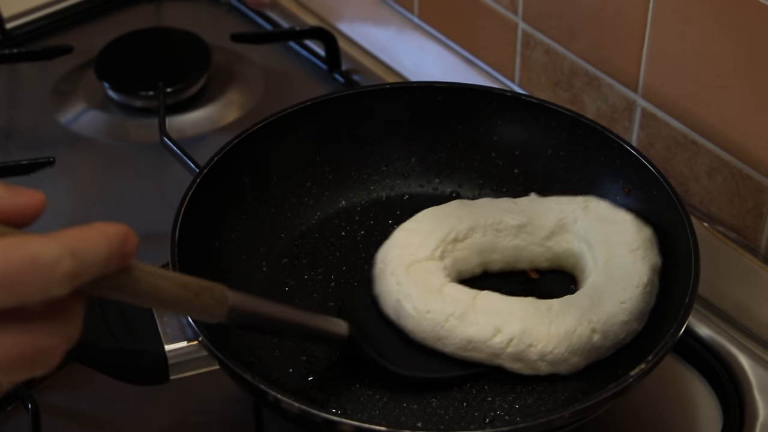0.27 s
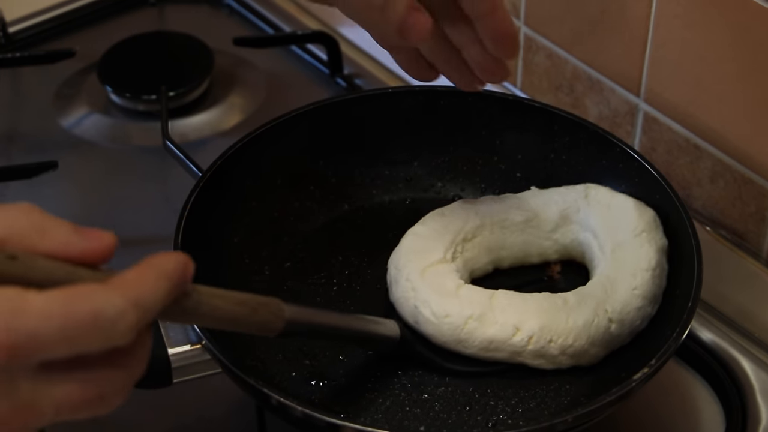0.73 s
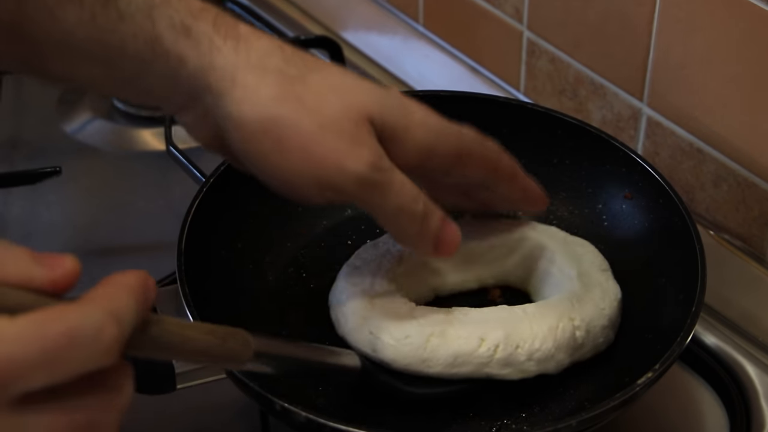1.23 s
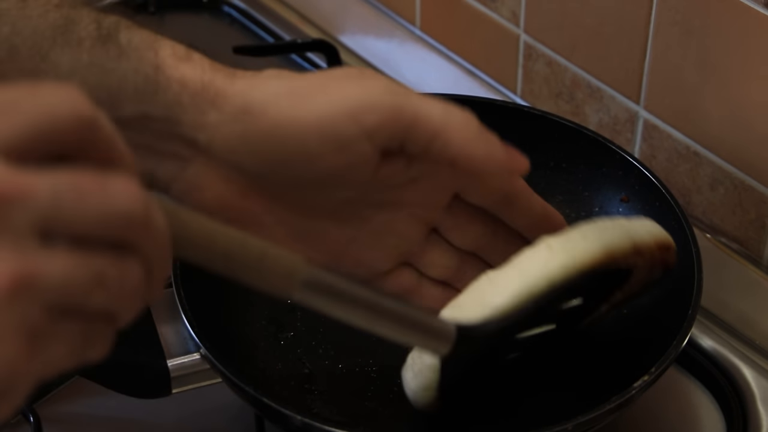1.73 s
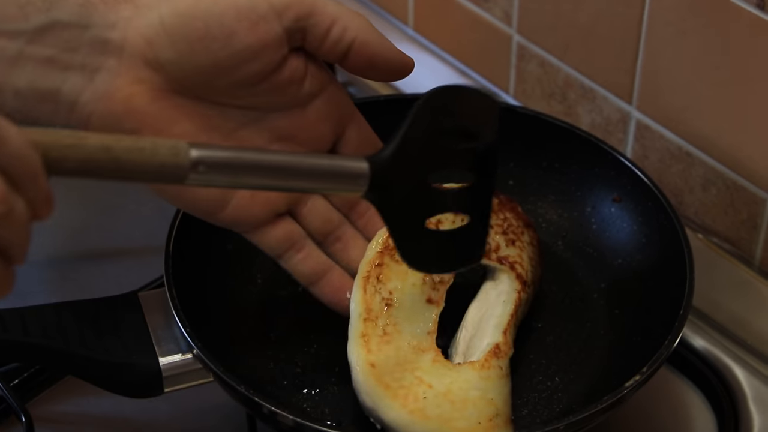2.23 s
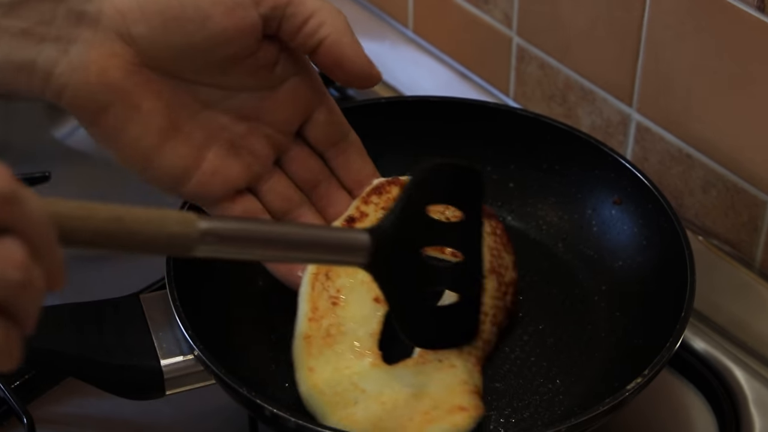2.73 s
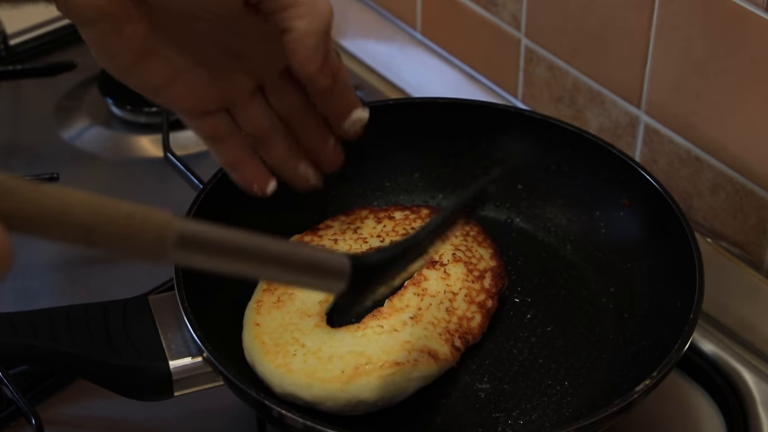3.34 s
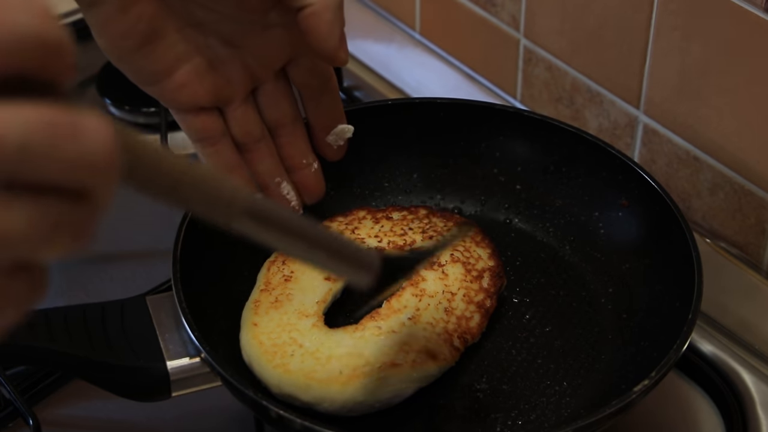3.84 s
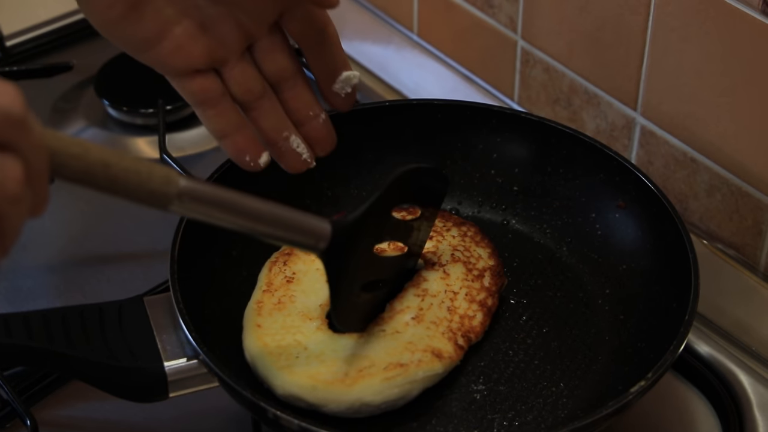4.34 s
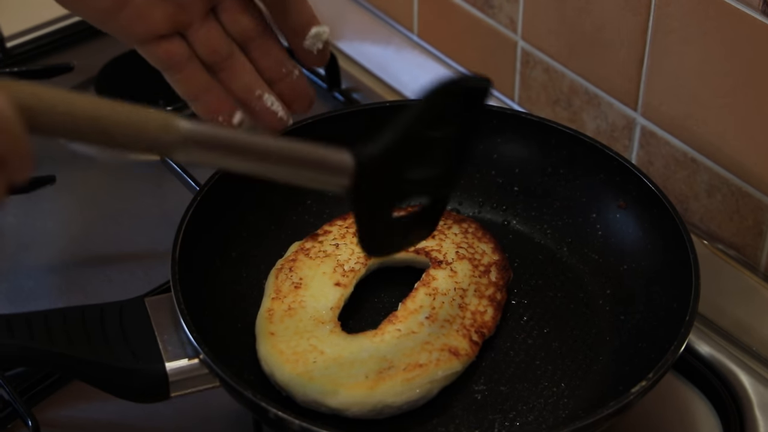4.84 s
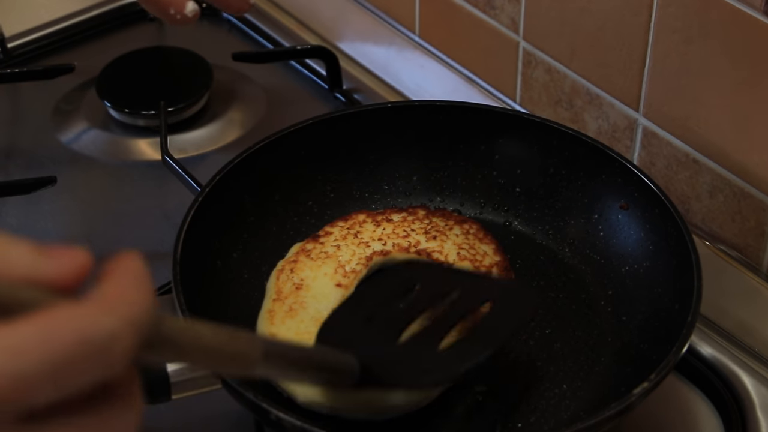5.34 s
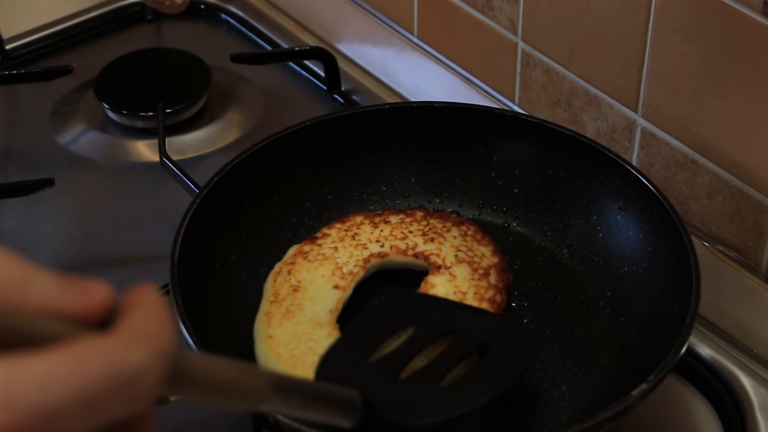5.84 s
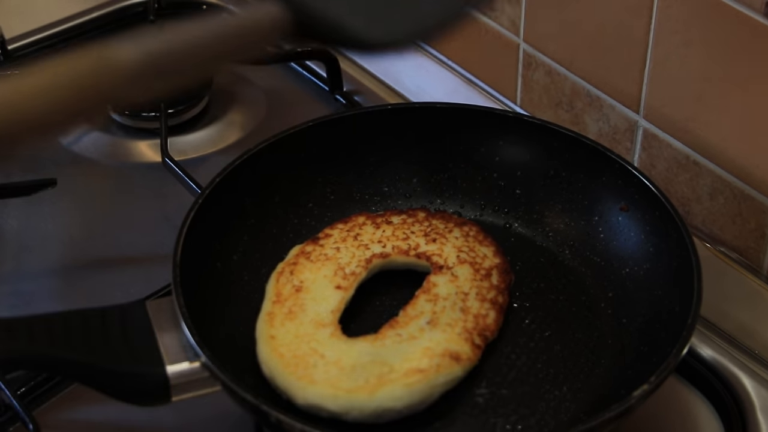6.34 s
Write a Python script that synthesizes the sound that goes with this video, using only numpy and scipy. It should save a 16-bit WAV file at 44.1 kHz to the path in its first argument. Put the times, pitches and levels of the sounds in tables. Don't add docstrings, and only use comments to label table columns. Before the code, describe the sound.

Close, near-mono sound of a pan on a kitchen stove, with very short reflections from tiles. From 0 to 2 seconds the oil sizzles thinly, broken by many crisp, irregular snaps of bursting drops. A spatula scrapes the pan in brief, ringing metallic strokes around 0.3 to 0.7 seconds, with a firm tap at 0.42 and soft steam puffs between 0.35 and 0.9. Drops pop loudly near 0.75 and 1.05; a hard click comes at 1.49, then lighter scraping from 1.6 to 1.9. Around 2.13 a sharp pop and light taps mark the flip, the pan ringing more freely. From 2.2 the raw side fries in a dense, bright sizzle, fullest from about 3 to 5 seconds, with tiny spits and thin, wavering high whistles, easing slightly by 6.6. A low air flutter passes near 3.4; faint burner rumble and hum lie underneath.

```python
import sys
import numpy as np
from scipy import signal
from scipy.fft import rfft, irfft, next_fast_len
from scipy.io import wavfile
from scipy.ndimage import map_coordinates

SR = 44100
rng = np.random.default_rng(int(sys.argv[2]) if len(sys.argv) > 2 else 0)


def gain_from_decibels(decibels):
    exponent = np.asarray(decibels, float) / 20
    return 10 ** exponent


def pcm_store(signal):
    levels = np.round(np.clip(np.atleast_2d(signal), -1, 1) * 32767)
    wavfile.write(sys.argv[1], SR, levels.astype(np.int16).T)


N = 290619

# (time [s], sizzle level [dB], finest spray level [dB])
OIL_LEVELS = [
    [(0.0, -40, -41), (0.188, -43.5, -44), (0.432, -39, -40), (0.582, -39, -42), (0.772, -36.5, -43),
     (0.884, -40.5, -47), (1.1, -44, -45)],
    [(1.1, -38.5, -40), (1.43, -44, -45), (1.688, -45.5, -44), (1.914, -48, -46), (2.034, -39, -37),
     (2.146, -34.5, -38), (2.2, -32, -30)],
    [(2.2, -33.5, -30), (2.31, -33.5, -32.5), (2.59, -29.5, -30.5), (2.99, -29.5, -30), (3.14, -26.5, -25),
     (3.48, -29.5, -28), (3.68, -27, -25), (4.07, -28, -26.5), (4.51, -26.5, -26), (4.82, -31, -24.5),
     (5.13, -29, -27), (5.43, -28.5, -26), (5.88, -29.5, -27.5), (6.33, -31, -30), (6.59, -31.5, -35)],
]
# (time [s], length [s], level [dB], spray over that [dB])
STEAM_PUFFS = [
    (0.348, 0.036, -33, -18),
    (.43, 0.093, -30, -12),
    (0.607, 0.067, -28, -13),
    (0.712, 0.053, -34, 0),
    (0.871, 0.066, -29.5, -8),
    (1.489, .025, -36, 3),
    (1.846, .12, -42, -18),
]
# (time [s], length [s], pitch [Hz], width [Hz], level [dB])
AIR_POCKETS = [
    (2.9, 1.04, 6200, 450, -5.5),
    (2.9, 1.04, 4950, 150, -9),
    (3.3, 1.9, 3460, 150, -11),
    (3.9, 1.37, 5250, 400, -5.5),
    (4., 1.3, 6670, 250, -10),
    (4.3, 2.3, 5540, 170, -8.5),
    (4.5, 1.8, 7170, 200, -10.5),
    (4.6, 1.2, 3230, 130, -14),
    (5.4, 1.35, 3530, 100, -5),
    (3.6, 2, 11230, 300, -12),
]
# (frequency [Hz], level [dB per Hz])
FIZZ_SPECTRUM = [(1470, -16), (2500, -2), (2840, -9.5), (3470, -2.5), (4250, -3), (5500, 1), (5990, 0.5),
                 (7070, 0), (9000, -8.5), (11700, -3), (19800, -120)]
SPRAY_SPECTRUM = [(5000, -27), (8500, -1.5), (12300, 4), (15100, 5), (15700, 3)]
# (time [s], ring [dB], second ring [dB], third ring [dB], rasp [dB])
PAN_LEVELS = [
    [(0.0, -43, -43.5, -44, -41.5), (0.37, -50.5, -51, -50, -43.5), (0.56, -40.5, -40, -45, -43),
     (0.72, -43, -46, -50, -46), (0.88, -36, -35, -46, -46), (1.33, -39, -41, -48, -47),
     (1.48, -38.5, -35.5, -51, -48), (1.67, -35, -36, -45, -43), (1.8, -35, -34, -37, -42),
     (1.95, -40, -42.5, -42.5, -46), (2.2, -39, -36, -38.5, -37)],
    [(2.2, -42, -40, -37, -40), (2.33, -36.5, -34.5, -36, -34), (2.54, -31.5, -32, -32, -33),
     (2.7, -32, -34, -37, -33.5), (2.87, -31, -36.5, -38, -36.5), (3.09, -32, -34, -38.5, -36.5),
     (3.28, -32.5, -33, -35.5, -37), (3.48, -34, -33.5, -33.5, -36), (3.63, -33, -29, -32.5, -34),
     (3.79, -34, -29, -32, -31), (4.2, -32, -33.5, -34.5, -40), (4.5, -33.5, -33.5, -34, -32.5),
     (4.73, -33, -32.5, -33, -30.5), (5.02, -36.5, -35.5, -37.5, -31), (5.23, -35.5, -37.5, -35.5, -34),
     (5.45, -35, -35.5, -34.5, -30.5), (5.75, -35, -36.5, -33.5, -41), (6.04, -34, -38, -35, -37),
     (6.41, -38, -39, -36, -41), (6.59, -38, -38.5, -37, -36)],
]
# (time [s], length [s], ring [dB], second ring [dB], third ring [dB], rasp [dB])
BLADE_STROKES = [(0.326, 0.079, -32, -35.5, -39, -37.5), (0.412, .018, -22, -36, -32, -24),
                 (0.435, 0.072, -23.5, -24.5, -28.5, -24), (0.611, 0.062, -23, -25.5, -29, -28.5),
                 (.69, 0.074, -33.5, -37, -45, -42), (0.89, 0.067, -47, -42.5, -44.5, -42),
                 (1.04, 0.069, -40, -40, -45.5, -53.5), (1.336, 0.053, -45.5, -42.5, -51, -50),
                 (1.597, 0.098, -29.5, -30.5, -41, -42), (1.697, 0.071, -29.5, -27, -33.5, -38),
                 (1.842, 0.069, -30, -27.5, -30, -32.5), (1.913, 0.044, -30, -32, -39, -38)]
# (pitch [Hz], width [Hz], level [dB])
LOW_MODES = [(746, 16, -7), (828.7, 37.8, 1), (912, 53, -4), (989, 118, -7.5), (537, 91, -16.5)]
SECOND_MODES = [(1194, 66, -9.5), (1265, 53, -6.5), (1383, 40, -0.5), (1442, 42, -3.5), (1530, 78, -7.5),
                (1691, 100, -8)]
THIRD_MODES = [(1890, 130, -4.5), (2093, 70, -1), (2229, 55, -1), (2414, 71, -4.5)]
RASP_MODES = [(2878, 370, 0), (3335, 270, -0.5), (3810, 170, -1.5), (4440, 420, -4.5), (5230, 430, -4),
              (6480, 230, -9)]
# (pitch [Hz], width [Hz], level [dB])
FREE_MODES = [(1386, 24, 1), (2063, 28, -5), (2225, 15, -2), (2860, 16, -1), (4560, 64, -1),
              (5100, 60, -10)]
# (time [s], length [s], level [dB])
CLEAR_RING = (1.96, 1.27, -33)
# (time [s], draught level [dB], burner level [dB], room level [dB])
KITCHEN_LEVELS = [(0.0, -51, -40, -43.5), (0.22, -51, -52, -47.5), (0.35, -60, -41, -39),
                  (0.86, -46, -46.5, -45), (1.54, -56, -43.5, -44.5), (1.91, -47, -42, -40),
                  (2.11, -54, -48.5, -46), (2.83, -51, -51.5, -44), (3.17, -51, -55, -41),
                  (3.32, -56, -44, -47.5), (3.47, -44, -52, -45), (3.72, -54, -53, -46),
                  (5.47, -54, -48.5, -45), (5.95, -49, -51.5, -46.5), (6.48, -58, -49, -45),
                  (6.59, -49, -55, -47)]
# (frequency [Hz], level [dB per Hz])
DRAUGHT_SPECTRUM = [(12, -39), (20, -10), (34, -9.5), (48, 7.5), (85, -2), (110, -37), (190, -120)]
BURNER_SPECTRUM = [(50, -25), (85, 0.5), (102, -0.5), (156, -7.5), (199, -0.5), (250, -9.5), (320, -31),
                   (550, -120)]
ROOM_SPECTRUM = [(150, -51), (250, -10), (344, 2), (461, -9.5), (483, -6), (516, 1.5), (599, -4.5),
                 (700, -4), (910, -42), (1540, -120)]
# (frequency [Hz], level [dB])
MAINS_HUM = [(100, -56)]
# (time [s], length [s], negative runs back from the time, pitch [Hz], level [dB])
HAND_GUST = (3.5, -0.2, 47, -26)
# (time [s], peak level [dB], pitch [Hz], spray [dB], spray t60 [s], pan knock [dB])
DROP_POPS = [(0.0044, -15.5, 10500, -16, 0.035, -16), (0.0777, -21, 6800, -9, 0.035, -16),
             (0.1327, -10.5, 11500, -10, 0.035, -13), (0.164, -14.5, 6900, -13, 0.035, -16),
             (0.2462, -6, 10600, -12, 0.045, -19), (0.4195, -11, 4200, -14, 0.035, -12),
             (0.4273, -14, 5600, -9, 0.035, -16), (0.5544, -17, 11500, -14, 0.035, -16),
             (0.5935, -26, 6480, -14, 0.035, -16), (0.7497, -5, 5830, -16, 0.029, -16),
             (0.839, -14, 6110, -19, 0.035, -14), (0.9355, -8.5, 6000, -19, 0.035, -16),
             (1.052, -2, 6500, -15, 0.033, -29), (1.1059, -21, 8070, -14, 0.035, -16),
             (1.1238, -16, 6540, -14, 0.035, -19), (1.1498, -12, 11600, -12, 0.035, -21),
             (1.1907, -13, 6700, -9.5, 0.046, -20), (1.2436, -11, 6600, -11.5, 0.055, -8),
             (1.3744, -23, 6010, -14, 0.035, -16), (1.4062, -24, 10300, -14, 0.035, -16),
             (1.4844, -7, 4770, -12.5, 0.032, -23), (1.4934, -6, 11400, -14, 0.035, -16),
             (1.5319, -12.5, 7970, -10, 0.035, -14), (1.5594, -17, 12400, -14, 0.035, -16),
             (1.5803, -18.5, 8600, -7, 0.035, -16), (1.6734, -14.5, 9900, -10, 0.035, -16),
             (1.7169, -26, 5040, -17, 0.035, -16), (1.7838, -26, 5050, -14, 0.035, -16),
             (1.9454, -14.5, 4300, -11, 0.039, -16), (1.9834, -15, 12800, -14, 0.035, -16),
             (2.0004, -16, 12000, -12, 0.035, -16), (2.0168, -12.5, 12800, -17, 0.035, -16),
             (2.0288, -18, 4300, -14, 0.035, -16), (2.0804, -12, 8300, -13, 0.035, -13),
             (2.134, -1.5, 12000, -16, 0.048, -19), (2.1944, -13, 11100, -11, 0.035, -14),
             (2.2577, -17, 4520, -9, 0.038, -16)]
# (pitch [Hz], width [Hz], level [dB])
BOWL_MODES = [(5830, 1600, 3.5), (11500, 4000, 1.5)]
# (time [s], click level [dB], click width [s], pan blow [dB])
EDGE_TAPS = [
    (.42, -10, 0.00012, 7),
    (1.4858, -4, 0.000087, 2.5),
    (1.7178, -24, .0001, 10),
    (2.132, -23, .0002, 8),
    (2.175, -24, .0002, 4),
]
# (time [s], peak level [dB], pitch [Hz])
SIZZLE_SPITS = [(2.401, 0, 9730), (3.0446, 0, 6830), (3.092, -14, 6270), (3.1319, -1, 6200),
                (3.3285, -8, 6840), (3.4467, -8, 5100), (3.4915, -1, 6210), (3.532, -2, 11100),
                (3.6637, -3, 11200), (3.7865, -12, 6160), (3.8229, -5, 4950), (4.12, 4, 6500),
                (4.1581, -1, 8260), (4.2808, -3, 5470), (4.3555, 1, 5590), (4.7303, 0, 7110),
                (4.7822, -9, 11900), (5.2062, 0, 9740), (5.2596, -14, 5610), (5.2925, -10, 12100),
                (5.4466, 3, 12700), (5.521, -1, 10700), (5.5479, -10, 5500), (5.7151, -10, 5360),
                (5.7769, -2, 12000), (5.8807, 3, 12100), (6.0907, -18, 5680), (6.194, -4, 5380),
                (6.229, -7, 5240), (6.4833, -8, 5850)]


def unit(x):
    return x / np.sqrt(np.mean(x ** 2) + 1e-20)


def along(points, hz):
    f, v = np.transpose(points)
    return np.interp(np.log(hz + 1), np.log(f + 1), v)


def curves(rows):
    s, *cols = np.transpose(rows)
    return [np.interp(np.arange(N) / SR, s, c) for c in cols]


def wobble(rate):
    knots = rng.standard_normal(int(N * rate / SR) + 4)
    return map_coordinates(knots, [np.arange(N) * rate / SR])


def swell(s, length):
    return np.sin(np.pi * np.clip((np.arange(N) / SR - s) / length, 0, 1)) ** 2


def filtered(x, response):
    m = next_fast_len(N + SR // 2)
    return irfft(rfft(x, m) * response(np.fft.rfftfreq(m, 1 / SR)), m)[..., :N]


def coloured(x, spectrum):
    return unit(filtered(x, lambda hz: gain_from_decibels(along(spectrum, hz))))


def ringing(x, modes):
    def response(f):
        total = 0
        for k, (centre, width, db) in enumerate(modes):
            damping = 1j * f * width
            total = total + (-1) ** k * gain_from_decibels(db) * damping / (centre * centre - f * f + damping)
        return total
    return filtered(x, response)


def bubbles(rate, spread_db, t60, bed_db):
    chance, size = rng.random(N), rng.exponential(1, N)
    starts = (chance < rate / SR) * gain_from_decibels(spread_db * np.minimum(size, 4)) ** 2
    power = signal.lfilter([1], [1, -gain_from_decibels(-120 / (t60 * SR))], starts)
    return unit(np.sqrt(power / power.mean() + gain_from_decibels(2 * bed_db)) * rng.standard_normal(N))


def chirps(count, hz, cycles, spread_db):
    draw, k = rng.random((count, 2)), np.arange(96)
    pitch = hz * np.exp(0.18 * rng.standard_normal((count, 1))) / SR
    size = gain_from_decibels(-spread_db * np.log(1 - 0.98 * draw[:, 1:]))
    wave = size * np.sin(2 * np.pi * pitch * k) * np.exp(-pitch * k / cycles)
    at = (draw[:, :1] * N).astype(int) + k
    return unit(np.bincount(at.ravel(), wave.ravel(), N + len(k))[:N])


def sizzle():
    fizz_db, spray_db = curves(sum(OIL_LEVELS, []))
    swarm = 0.8 * wobble(12) + 0.8 * wobble(45)
    common = bubbles(rate=270, spread_db=2.0, t60=0.036, bed_db=2.5)
    fine = bubbles(rate=340, spread_db=2.5, t60=0.013, bed_db=-15.0)
    fizz = coloured(common, FIZZ_SPECTRUM)
    fizz = fizz + gain_from_decibels(-10.5) * chirps(count=1500, hz=5600, cycles=2.9, spread_db=2.5)
    for s, length, hz, width, db in AIR_POCKETS:
        fizz = fizz + gain_from_decibels(db) * swell(s, length) ** 0.5 * unit(ringing(fine, [(hz, width, 0)]))
    spray = coloured(common + 0.97 * fine, SPRAY_SPECTRUM)
    spray = spray + gain_from_decibels(-11.5) * chirps(count=2500, hz=11500, cycles=4.5, spread_db=6.0)
    fizz_gain = gain_from_decibels(fizz_db + swarm + 0.26 * wobble(20))
    spray_gain = gain_from_decibels(spray_db + swarm + 0.81 * wobble(30))
    for s, length, db, fine_db in STEAM_PUFFS:
        puff = gain_from_decibels(db) * swell(s, length)
        fizz_gain = fizz_gain + puff
        spray_gain = spray_gain + gain_from_decibels(fine_db) * puff
    return fizz_gain * fizz + spray_gain * spray


def pan():
    grains = gain_from_decibels(1.15 * wobble(25)) * bubbles(rate=250, spread_db=2.0, t60=0.019, bed_db=2.5)
    boil = gain_from_decibels(0.5 + np.array(curves(sum(PAN_LEVELS, []))) + 0.79 * wobble(9))
    drag = sum(gain_from_decibels(levels_db)[:, None] * stroke(s, length) for s, length, *levels_db in BLADE_STROKES)
    families = [unit(ringing(grains, modes)) for modes in (LOW_MODES, SECOND_MODES, THIRD_MODES, RASP_MODES)]
    s, length, free_db = CLEAR_RING
    free = gain_from_decibels(free_db) * swell(s, length) * unit(ringing(grains, FREE_MODES))
    return np.sum(np.hypot(boil, drag) * families, axis=0) + free


def kitchen():
    draught_db, burner_db, room_db = curves(KITCHEN_LEVELS)
    t = np.arange(N) / SR
    draught = gain_from_decibels(draught_db + 1.5 * wobble(4.5)) * coloured(rng.standard_normal(N), DRAUGHT_SPECTRUM)
    s, length, gust_hz, gust_db = HAND_GUST
    gust = gain_from_decibels(gust_db) * swell(s, length) * np.tanh(1.5 * np.sin(2 * np.pi * gust_hz * (t - s)))

    def rumble():
        burner = gain_from_decibels(burner_db) * coloured(rng.standard_normal(N), BURNER_SPECTRUM)
        return burner + gain_from_decibels(room_db) * coloured(rng.standard_normal(N), ROOM_SPECTRUM)

    middle, side = rumble(), rumble()
    hum = sum(gain_from_decibels(db + 2.3 * wobble(2.84)) * np.sin(2 * np.pi * hz * t) for hz, db in MAINS_HUM)
    return draught + gust + middle + hum + gain_from_decibels(-21.5) * side * [[1], [-1]]


def pops(table):
    snaps, sprays, knocks = np.zeros(N + SR), np.zeros(N + SR), np.zeros(N)
    t = np.arange(SR // 8) / SR
    for s, db, hz, spray_db, t60, knock_db in table:
        at = round((s + 0.001102) * SR)
        attack = 1 - np.exp(-t * hz * 0.84)
        decay = gain_from_decibels(db - 60 * t * hz / 11)
        snaps[at:][:len(t)] += decay * np.sin(2 * np.pi * hz * t) * attack
        band = signal.butter(1, [hz * 0.53, min(hz * 2.8, SR / 2.2)], "bandpass", fs=SR)
        noise = unit(signal.lfilter(*band, rng.standard_normal(len(t))))
        sprays[at:][:len(t)] += gain_from_decibels(db + spray_db - 60 * t / t60) * noise
        knocks[at] = gain_from_decibels(db + knock_db + 21.5)
    knocked = ringing(knocks, LOW_MODES + SECOND_MODES + THIRD_MODES + RASP_MODES)
    return 2.22 * snaps[:N] + ringing(sprays[:N], BOWL_MODES) + knocked


def walls(x):
    t60, level_db = 0.058, -14
    t = np.arange(SR // 4) / SR
    tail = rng.standard_normal(len(t)) * gain_from_decibels(-60 * t / t60) * (t > 0.003)
    return x + gain_from_decibels(level_db) * signal.fftconvolve(x, tail / np.linalg.norm(tail))[:N]


def stroke(s, length):
    t = np.arange(N) / SR - s
    return np.clip(t / 0.019, 0, 1) * gain_from_decibels(-np.clip(t - length, 0, 1) * 60 / 0.072)


def taps():
    t = np.arange(N) / SR
    clicks, blows = np.zeros(N), np.zeros(N)
    for s, db, width, blow_db in EDGE_TAPS:
        u = np.clip((t - s) / width, -9, 9)
        click = gain_from_decibels(db) * (2 * u ** 2 - 1) * np.exp(-u ** 2)
        clicks += click
        blows += gain_from_decibels(blow_db) * np.minimum(click, 0)
    return clicks + gain_from_decibels(10.5) * ringing(blows, FREE_MODES + LOW_MODES[:2])


def spits():
    return pops([(s, db - 4, hz, -15, 0.025, -18) for s, db, hz in SIZZLE_SPITS])


def scene():
    return sizzle() + pan() + kitchen() + walls(pops(DROP_POPS) + taps() + spits())


def top_cut(x):
    return signal.sosfilt(signal.butter(12, 17010, fs=SR, output="sos"), x)


def record(dry):
    mix = filtered(dry, lambda hz: hz < 15900)
    return top_cut(mix)


dry = scene()
out = record(dry)
pcm_store(out)
```